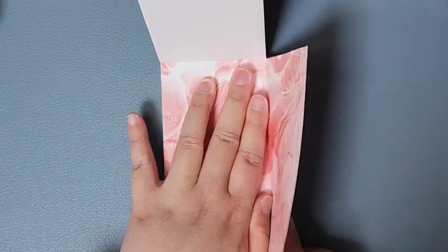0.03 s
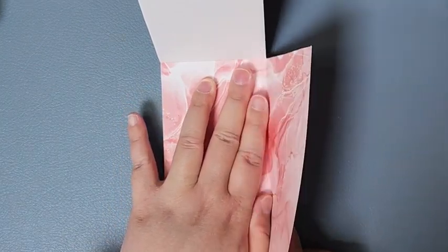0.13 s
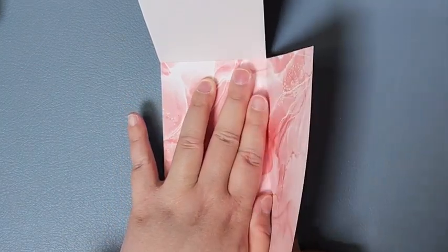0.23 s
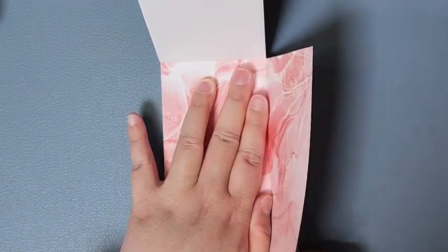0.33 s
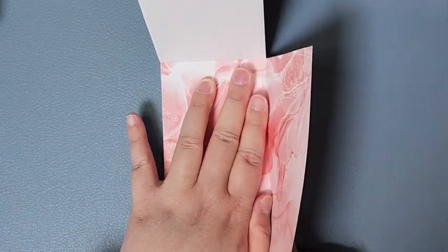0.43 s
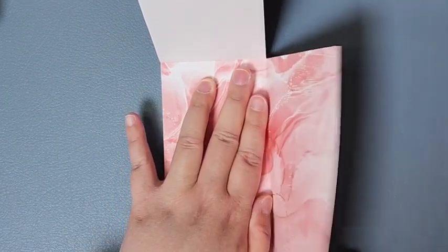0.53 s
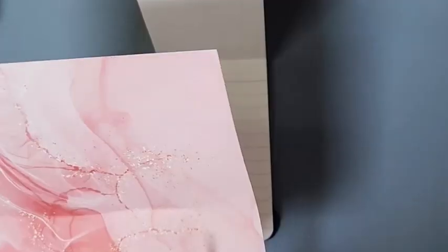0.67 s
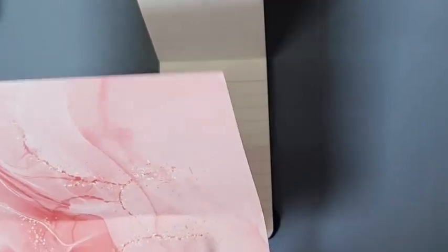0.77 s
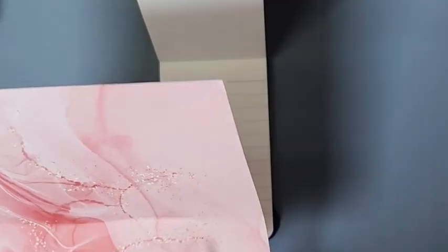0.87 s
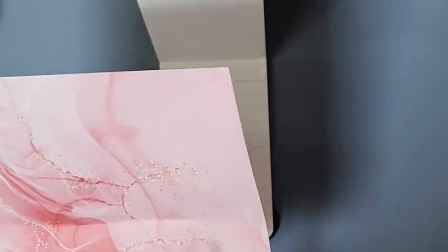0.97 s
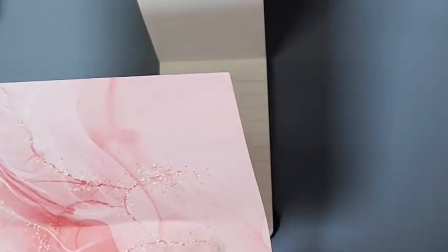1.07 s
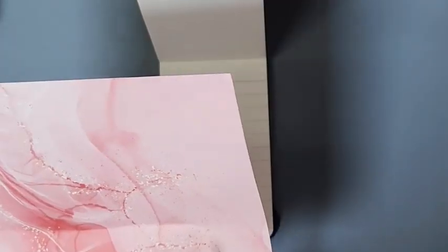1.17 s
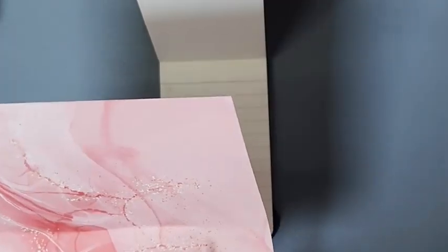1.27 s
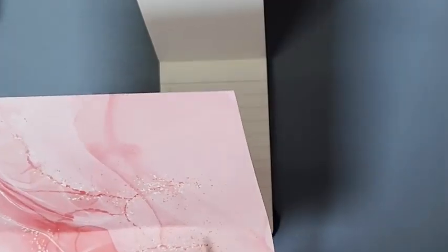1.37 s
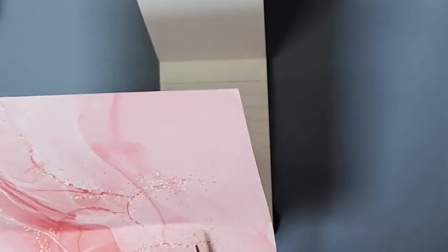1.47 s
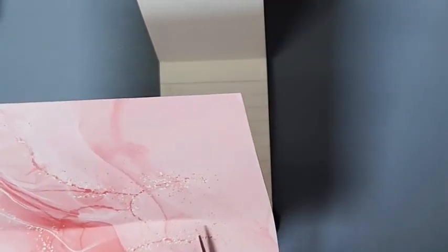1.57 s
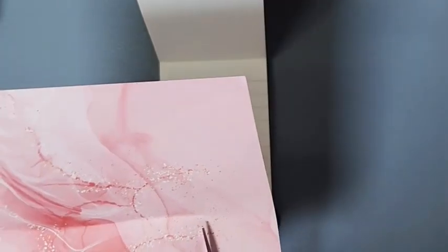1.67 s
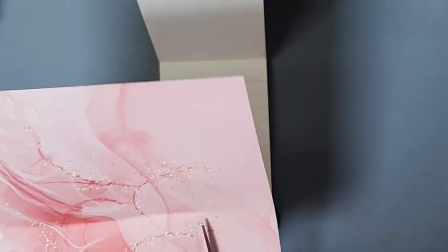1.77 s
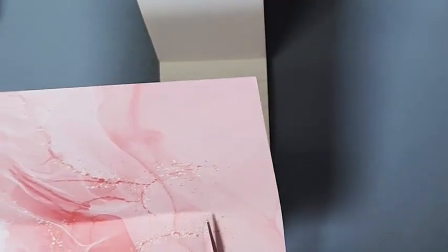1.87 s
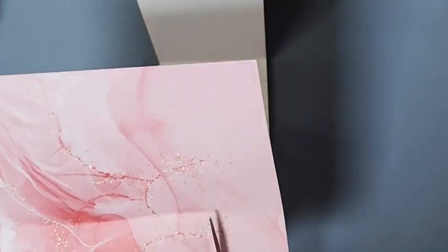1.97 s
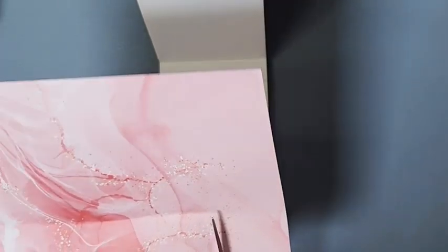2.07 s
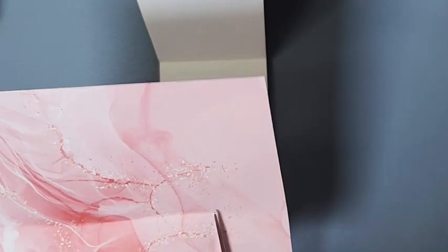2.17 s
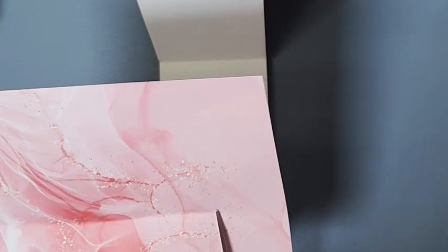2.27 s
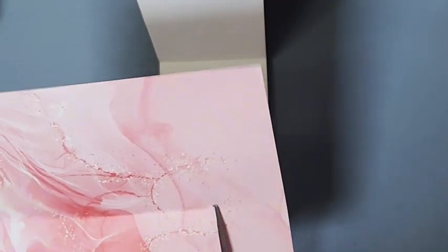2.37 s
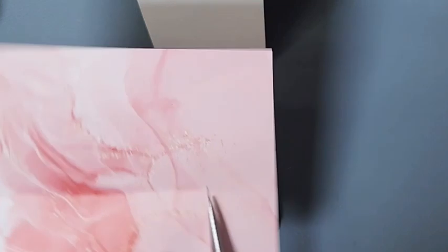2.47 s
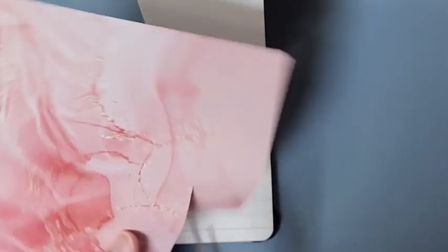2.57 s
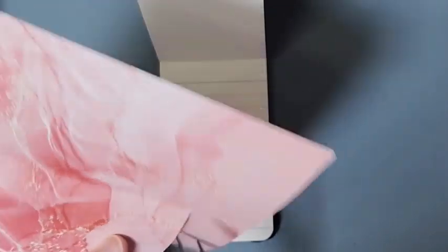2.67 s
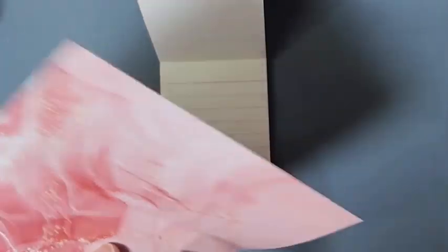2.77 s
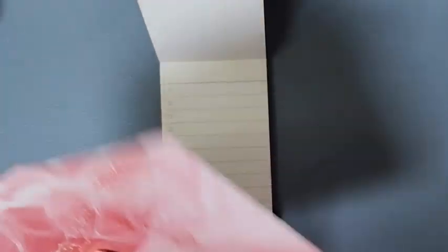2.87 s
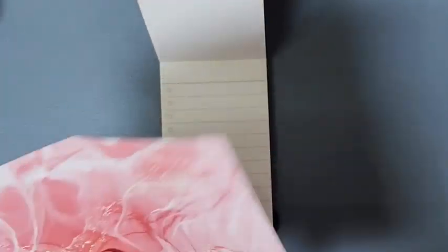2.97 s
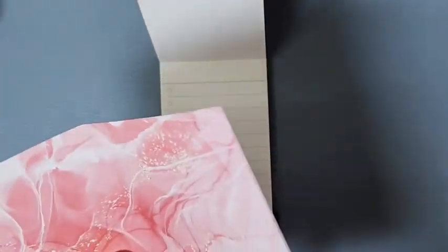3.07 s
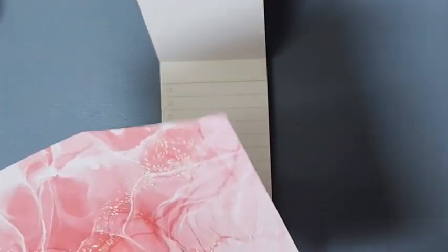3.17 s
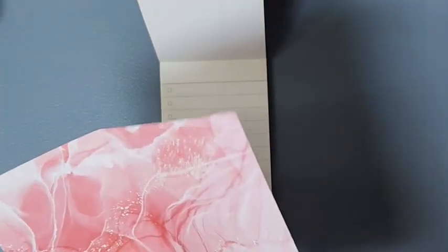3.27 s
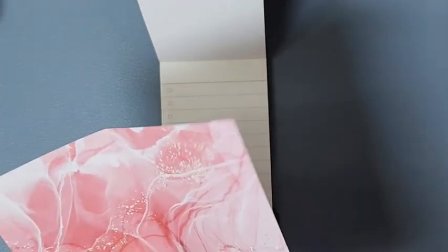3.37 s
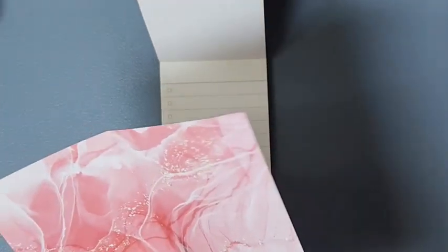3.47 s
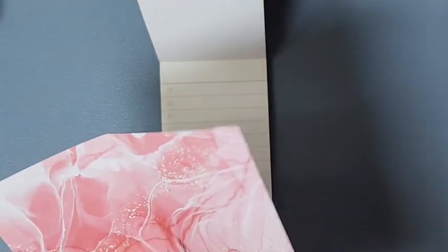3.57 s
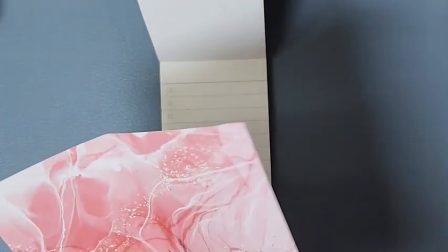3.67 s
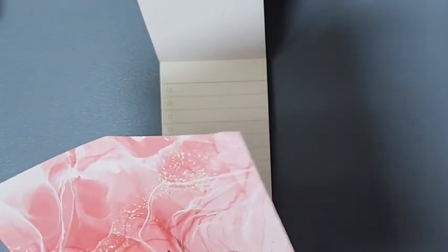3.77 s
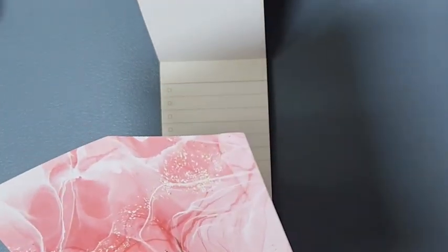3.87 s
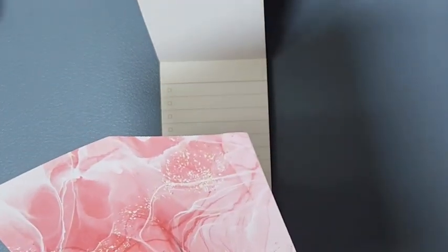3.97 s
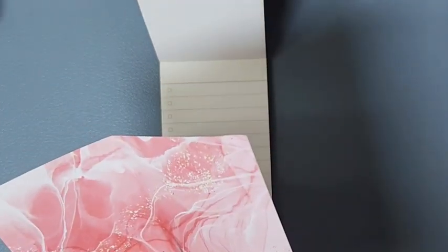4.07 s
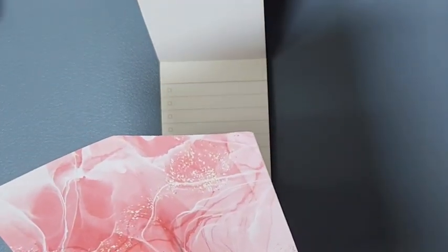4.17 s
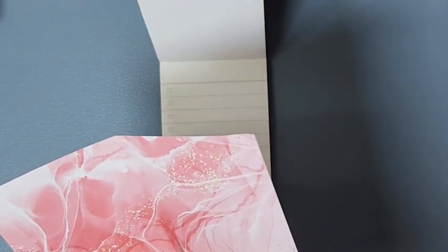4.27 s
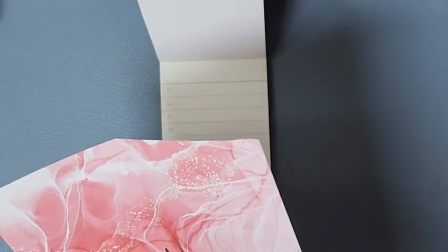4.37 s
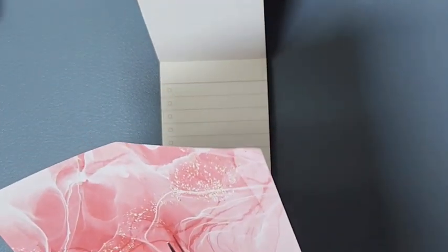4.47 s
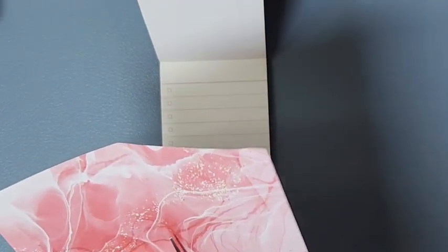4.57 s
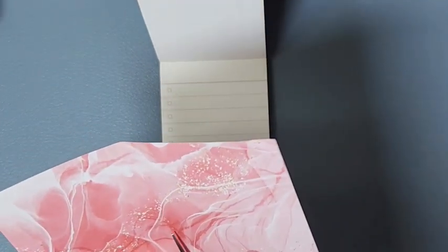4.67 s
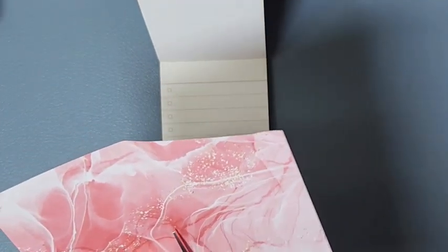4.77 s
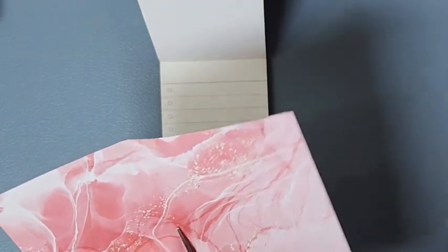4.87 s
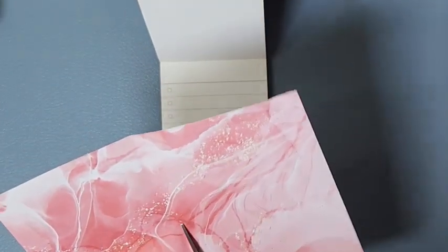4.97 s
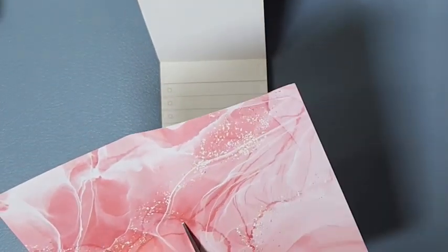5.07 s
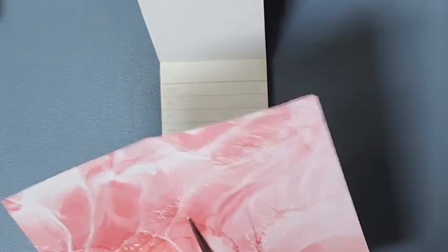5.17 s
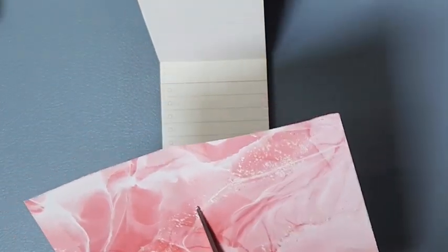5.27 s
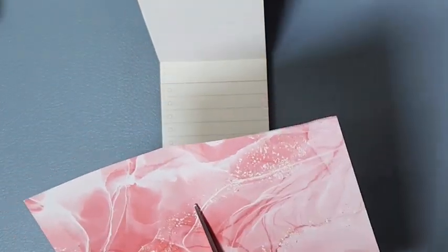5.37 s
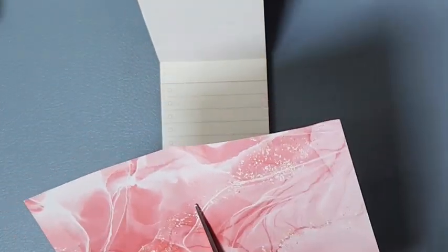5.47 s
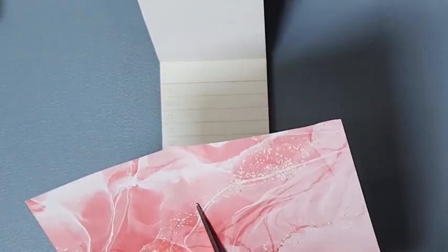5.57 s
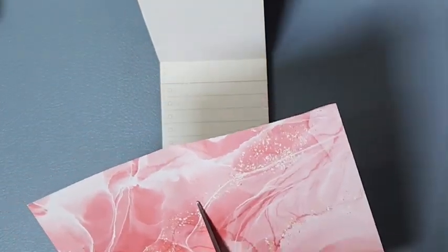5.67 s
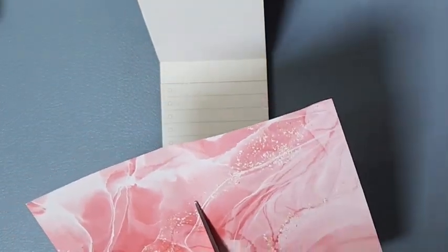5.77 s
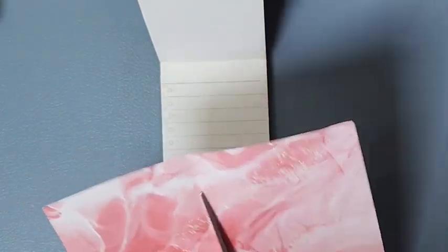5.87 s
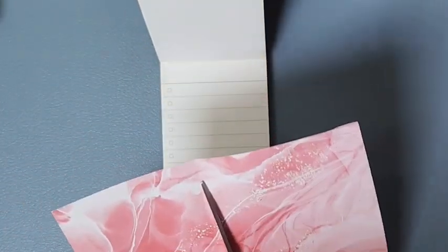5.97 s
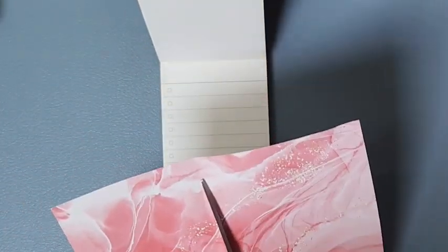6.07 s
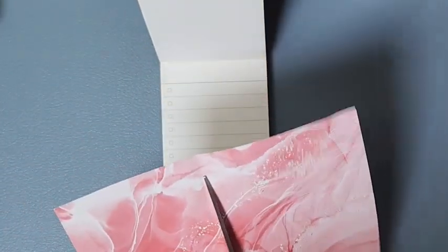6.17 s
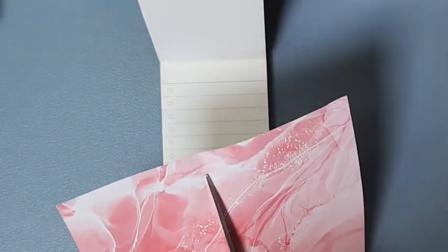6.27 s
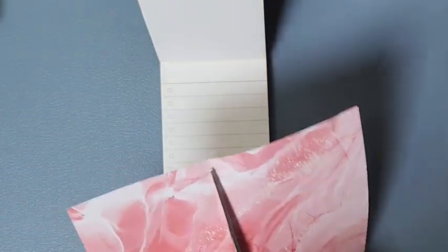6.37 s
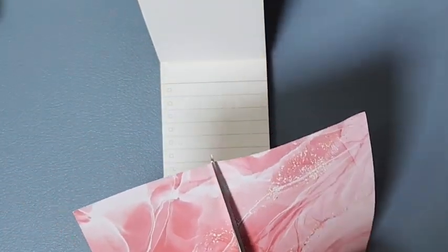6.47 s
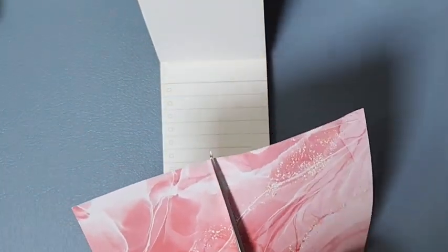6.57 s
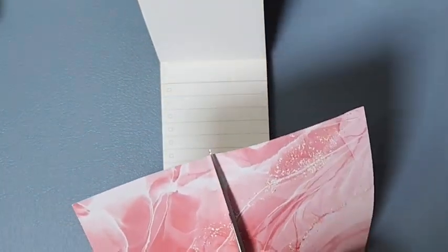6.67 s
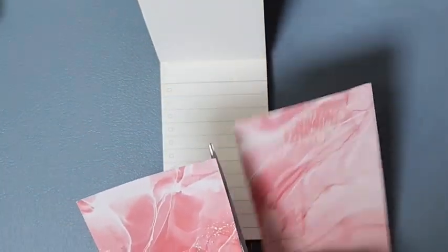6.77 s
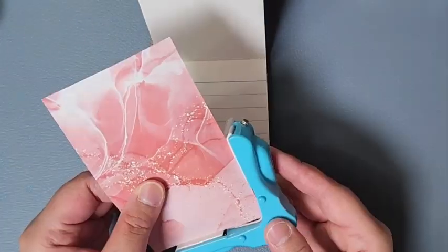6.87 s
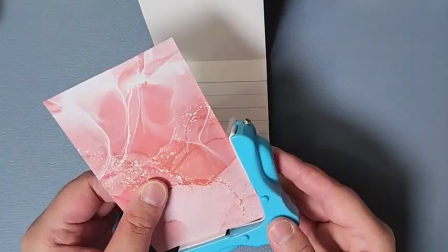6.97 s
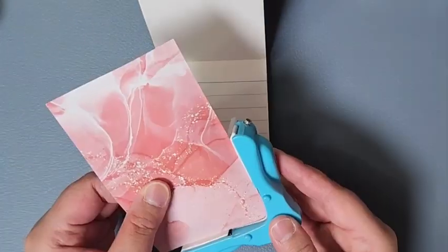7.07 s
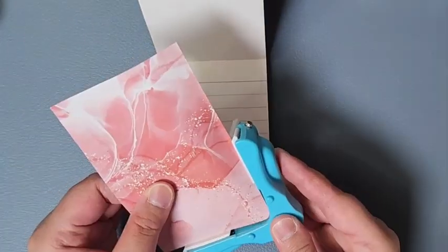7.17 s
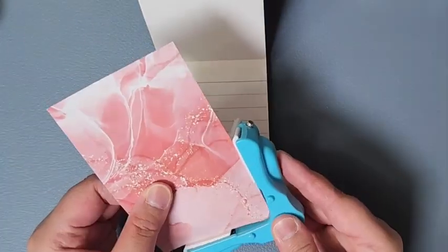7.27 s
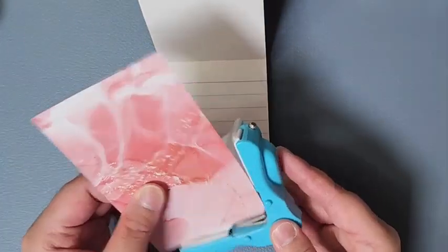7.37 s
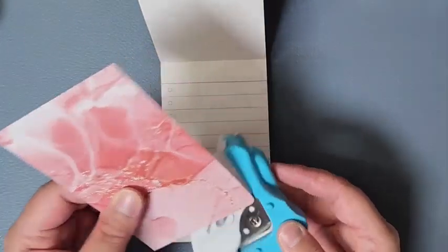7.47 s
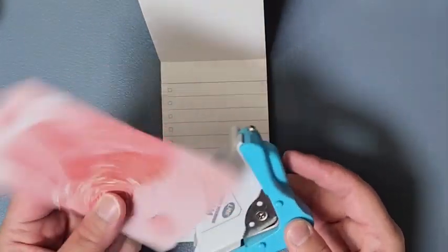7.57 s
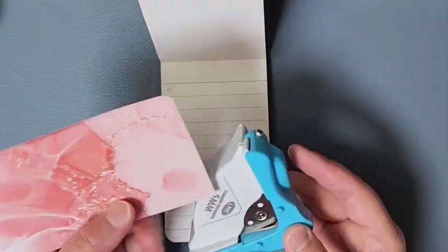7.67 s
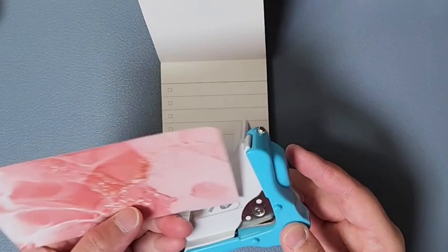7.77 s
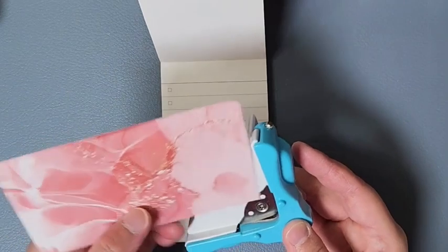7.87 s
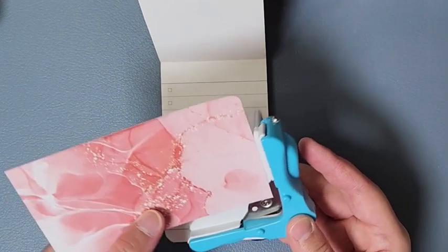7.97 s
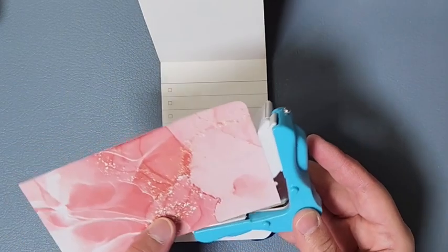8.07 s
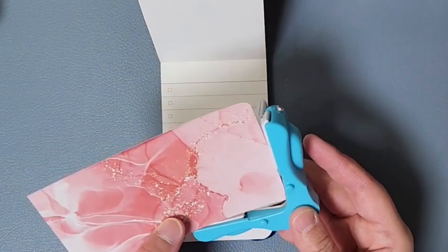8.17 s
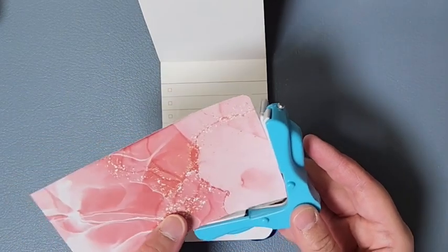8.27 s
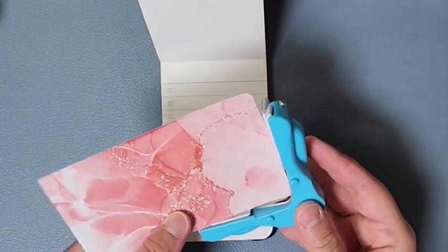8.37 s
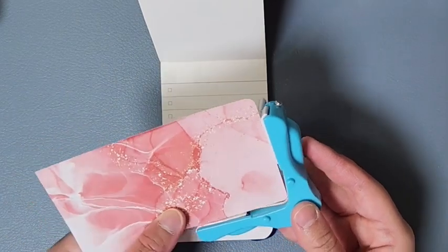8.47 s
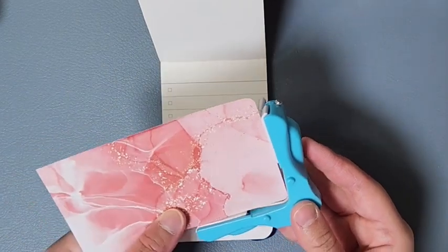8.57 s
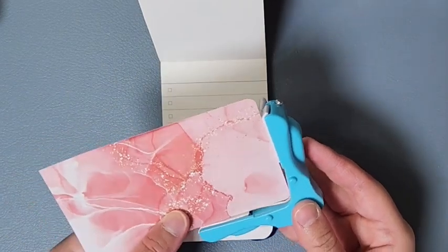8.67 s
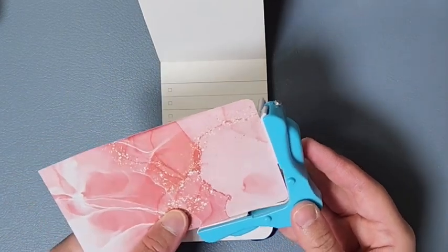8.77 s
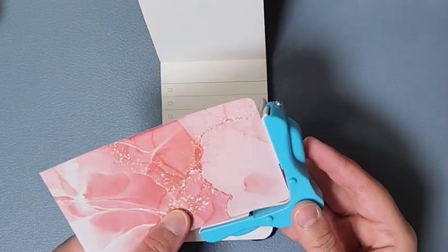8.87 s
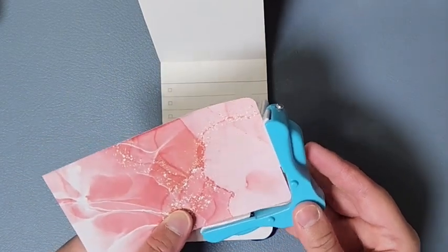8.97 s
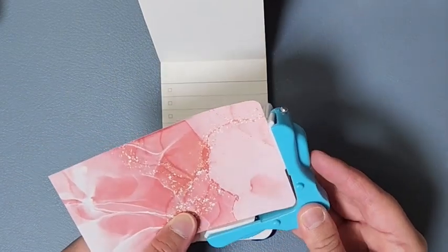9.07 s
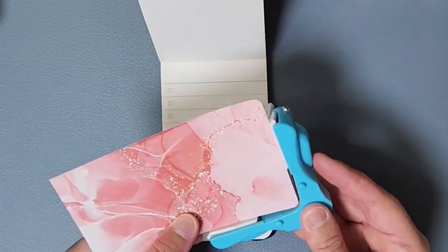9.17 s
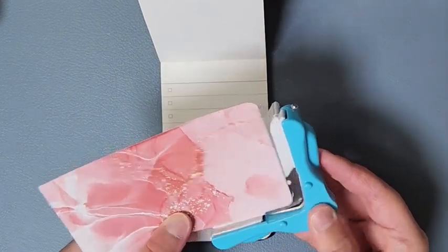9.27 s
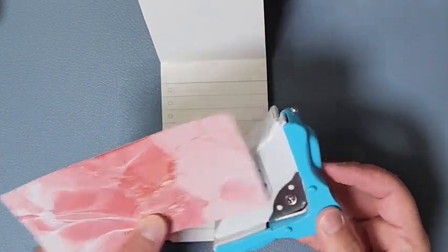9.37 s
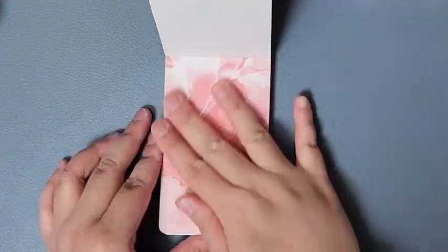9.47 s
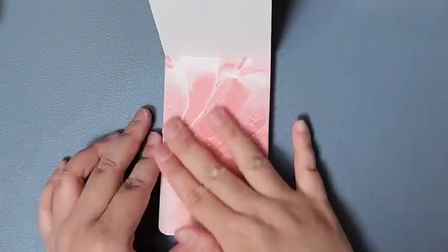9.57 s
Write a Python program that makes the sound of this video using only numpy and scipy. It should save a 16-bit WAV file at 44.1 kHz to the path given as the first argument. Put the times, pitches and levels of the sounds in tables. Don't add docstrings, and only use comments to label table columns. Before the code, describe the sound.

Scissors crunch jerkily through a paper sheet amid rustling and taps, followed by two sharp corner-punch clacks with dull desk thuds in a damped room.

```python
import sys
import numpy as np
from scipy import signal
from scipy.fft import rfft, irfft
from scipy.io import wavfile
from scipy.ndimage import uniform_filter1d

SR = 44100
rng = np.random.default_rng(int(sys.argv[2]) if len(sys.argv) > 2 else 0)


def pcm_store(signal):
    levels = np.round(np.clip(np.atleast_2d(signal), -1, 1) * 32767)
    wavfile.write(sys.argv[1], SR, levels.astype(np.int16).T)


def level_to_linear(level):
    exponent = np.asarray(level, float) / 20
    return 10 ** exponent


N = 423801

# frequency [Hz], density [dB per Hz].
AIR_SPECTRUM = [(36, -28.5), (45, -13), (70, -3.5), (90, -21.5), (130, -8.5), (170, -26.5), (240, -21),
                (400, -34), (560, -33), (2200, -41.5), (3600, -36.5), (6800, -39), (7200, -43),
                (15500, -49)]
# frequency [Hz], level [dB].
HUM_LINES = [(48.4, -57.5), (59.5, -63.5), (128, -72.5)]

# start [s], length [s], first level [dB], last level [dB], brightness [dB].
SMOOTHING = [
    (0.109, 0.29, -48.5, -74, -12.5),
    (0.222, 0.083, -51.5, -53, -12.5),
    (0.592, 0.035, -58, -49, -6),
    (0.628, 0.038, -44.5, -42, -1),
    (9.518, 0.11, -50, -47, 5),
]
# start [s], length [s], first and last level [dB], brightness [dB].
RUSTLES = [(0.506, 0.085, -58, -65, -18), (0.703, 0.12, -71, -56, -1), (0.831, 0.17, -60, -75, -3.5),
           (0.978, 0.063, -77, -50.5, -4), (1.04, 0.11, -44.5, -78, -1), (2.398, 0.079, -58.5, -57.5, -1.5),
           (2.46, 0.13, -48, -32, -3), (2.571, 0.11, -43, -42, 5), (2.687, 0.13, -58, -43.5, 0),
           (2.765, 0.095, -43, -40.5, -3.5), (2.857, 0.069, -45, -41, 1), (2.931, 0.15, -44, -48, 0.5),
           (3.086, 0.078, -50, -60.5, 1.5), (3.165, 0.17, -56, -53, -4), (3.349, 0.12, -53.5, -65, 0),
           (3.451, 0.094, -57, -77, -16), (5.349, 0.09, -58.5, -66.5, -6.5), (6.248, 0.075, -62, -53, -7),
           (6.495, 0.047, -54, -55.5, -10), (6.55, 0.15, -53.5, -64, -7.5),
           (6.836, 0.025, -51.5, -43.5, -4), (6.865, 0.01, -32, -42.5, -4), (6.876, 0.024, -35, -34, -0.5),
           (6.909, .015, -45, -47, 2), (7.146, 0.032, -43, -50, -7), (7.31, 0.098, -57, -60.5, 2),
           (7.392, .035, -57, -62, 4), (7.545, 0.18, -66.5, -54, 5.5), (7.722, 0.18, -58.5, -59.5, 0.2),
           (7.947, 0.19, -70.5, -57.5, -1), (8.205, 0.09, -58, -57, -5), (8.384, 0.19, -61, -57, -8),
           (8.546, 0.056, -47, -66.5, -26), (9.29, 0.039, -68, -46.5, -2), (9.401, 0.1, -57, -53.5, -0.5)]
# time [s], peak [dB], hiss [dB], length [s].
SNAPS = [(.319, -55, -30, 0.015), (.503, -44, -39, 0.009), (2.578, -23, -14, 0.012),
         (2.772, -35, -3, 0.0063), (2.801, -40, -1, 0.012), (2.848, -35, -9, 0.0073),
         (2.943, -39, 9, 0.0047), (2.507, -27, 0.5, 0.0059), (2.607, -33.5, -3, .005),
         (2.624, -29.5, 1, 0.0037), (2.93, -37.5, 0.5, 0.011), (3.297, -37, -10, 0.0089),
         (3.312, -36.5, -10, 0.017), (3.345, -41, -7, 0.0035), (5.035, -26, -4, 0.0025),
         (5.052, -37, -6, 0.0024), (5.064, -38, -9, 0.003), (5.088, -43.5, -5, 0.004),
         (5.104, -45, -7, 0.0053), (5.4, -54, -19, 0.016), (5.537, -43.5, -27, 0.02),
         (6.283, -31, -17, 0.0039), (6.318, -42, -14, 0.0061), (6.613, -34, -41, 0.014),
         (6.863, -20, -13, .003), (6.929, -27, -7, 0.0013), (7.108, -32.5, -25, 0.01),
         (7.139, -31, -22, 0.0044), (7.71, -31.5, -35, 0.013), (7.812, -41.5, -13, 0.01),
         (7.954, -48, -8, 0.0044), (7.991, -50.5, -21.5, 0.0086), (8.223, -47, -13, 0.0046),
         (8.265, -44, -11, .004), (8.28, -49.5, -8, .005), (8.955, -46, -12, 0.0055),
         (8.007, -38, -15.5, 0.0088), (8.46, -46.5, -8, 0.014), (8.542, -26, -16, 0.017),
         (8.652, -32.5, -13, 0.012), (8.739, -40, -21, 0.009), (9.274, -33.5, -17, 0.012)]
# time [s], peak [dB].
KNOCKS = [(0.337, -25), (0.344, -19), (0.348, -9.5), (0.581, -14.5), (.589, -12.5), (0.599, -18),
          (.613, -26), (0.632, -16.5)]
# frequency [Hz], level [dB], decay time T60 [s].
PAD_MODES = [(209, -16, 0.089), (455, -18.5, 0.1), (686, -1.5, 0.043), (822, -3, 0.053), (1250, -16, .025)]
# time [s], peak [dB], frequency [Hz], T60 [s].
HOLLOW_TAPS = [(0.125, -33, 93, 0.062), (1.179, -46, 375, 0.44), (3.239, -38, 502, 0.17),
               (3.32, -35, 523, 0.04), (3.911, -59, 576, 0.096), (6.311, -38, 1417, 0.065),
               (8.152, -37, 1660, 0.045), (7.669, -38.5, 490, 0.058), (7.723, -35.5, 470, 0.03),
               (8.055, -34, 520, 0.03), (8.313, -33, 1218, 0.045), (8.681, -20.5, 401.4, 0.075)]
# time [s], peak [dB], flap [dB], hiss [dB], length [s].
DROPS = [(2.507, -23.5, -46.5, -15, 0.023), (2.555, -17.5, -3, 3, 0.0015), (2.918, -12, -6, -30, 0.022),
         (6.807, -17, -4, -14, 0.0059), (6.939, -14, -12, -10.5, 0.0083), (7.04, -13, -11.5, -35.5, 0.018),
         (7.396, -34, -0.5, -16, 0.012), (7.4, -16.5, -10, -14.5, 0.0061), (7.408, -42, -2, -16, 0.023),
         (8.511, -37.5, -4.5, -6.5, 0.013), (8.679, -26, 1, -13.5, 0.017)]
# frequency [Hz], width [Hz], gain [dB].
SHEET_PEAKS = [(493, 58, 3.5), (1338, 32, 9.5), (3800, 840, 1), (5500, 3800, 7)]
DESK_TOP_PEAKS = [(379, 91, 1.5), (620, 240, -3), (1330, 1500, 19.5)]
# from [s], to [s], first and last pitch [Hz], level over the rustle [dB].
HUMMING_PANELS = [(2.76, 2.87, 3440, 3570, -4), (2.77, 2.87, 1350, 1300, -24), (2.95, 3.1, 1300, 1250, -12),
                  (2.94, 3.03, 514, 527, -2), (3.19, 3.36, 1270, 1250, 4), (3.2, 3.42, 549, 542, -6),
                  (3.2, 3.34, 3480, 3460, -3), (3.2, 3.36, 5500, 5600, -3)]

# time [s], blades meeting at 0 (pivot) to 1 (tips), crispness of the taut edge [dB].
CUT_REACH = [(1.15, 0.046, 3), (1.619, 0.14, -1.5), (1.69, 0.63, -4), (2.15, 0.56, -1.5), (2.34, 0.5, 2.5),
             (4.3, 0.051, 3.5), (4.86, 0.4, -1), (4.93, 1, -6), (5.6, 0.93, -10.5), (6.2, 0.75, -12),
             (6.762, 0.47, -4.5), (6.82, 0.67, -20)]
# start [s], length [s], first and last level [dB], sheet stiffness [dB].
CUTS = [(1.14, 0.11, -73, -53, -3), (1.252, 0.5, -57, -51.5, -6), (2.165, 0.21, -77, -49.5, -44),
        (4.3, 0.6, -57, -54.5, -11.5), (4.873, 0.22, -37, -59.5, -5), (5.575, 0.112, -54, -43.5, -23),
        (6.153, 0.037, -27, -39.5, -13.5), (6.639, 0.18, -62, -28, -11)]
# centre [s], level [dB], length [s].
SLOW_JERKS = [(1.1768, -41, 0.038), (1.213, -48.5, 0.022), (1.24, -45.5, 0.0095), (1.257, -51, .007),
              (1.293, -48, 0.016), (1.3318, -46, 0.0065), (1.358, -48.5, .011), (1.382, -49, 0.01),
              (1.429, -45, 0.037), (1.459, -42, 0.014), (1.4866, -38.5, 0.014), (1.521, -43, 0.011),
              (1.536, -39, 0.012), (1.5606, -36.5, 0.0095), (1.587, -36.5, 0.016), (1.599, -37, .005),
              (1.615, -36, 0.018), (1.632, -37, 0.0086), (1.645, -34, 0.013), (1.673, -26.5, 0.012),
              (1.7, -28, 0.012), (1.729, -31, 0.0044), (4.36, -53.5, 0.012), (4.419, -52, .008),
              (4.464, -50.5, 0.031), (4.512, -53, 0.027), (4.587, -42, 0.012), (4.623, -51.5, 0.0067),
              (4.646, -42, 0.0066), (4.6678, -39.5, 0.008), (4.686, -47, .006), (4.71, -41, 0.018),
              (4.741, -44.5, 0.009), (4.761, -42, 0.017), (4.7877, -37.5, 0.0094), (4.823, -39, 0.0055),
              (4.847, -37, 0.014), (4.866, -35, 0.011), (4.905, -34, 0.023), (4.93, -29, 0.013),
              (4.9698, -15, 0.008), (5.011, -11.5, 0.0062)]
# centre [s], level [dB], length [s], brightness [dB].
QUICK_JERKS = [(2.127, -51, 0.0093, 1), (2.1584, -28, 0.017, -1), (2.174, -33, 0.0059, -3),
               (2.197, -24, 0.0064, -3), (2.215, -42.5, .004, 2.5), (2.242, -25.5, 0.011, -2.5),
               (2.2657, -33.5, 0.006, 3.5), (2.28, -46.5, 0.0021, 3.5), (2.301, -23.5, 0.0056, 3.5),
               (2.323, -28.5, 0.0094, 1), (2.343, -17, 0.0042, 2.5), (5.587, -31, 0.0049, -1.5),
               (5.603, -24.5, 0.0082, 3), (5.619, -22.5, 0.0065, -1), (5.633, -23.5, 0.0086, 3.5),
               (5.651, -26.5, 0.0078, 2), (5.676, -16, 0.0053, 1.5), (5.687, -24, 0.011, -2),
               (6.15, -24.5, 0.012, 3.5), (6.168, -23.5, 0.012, 0.5), (6.179, -25.5, 0.0062, -6),
               (6.187, -25.5, .005, 0.5), (6.21, -12.5, 0.0058, 4), (6.664, -39.5, 0.0039, -9.5),
               (6.686, -24, 0.018, -6.5), (6.713, -15.5, 0.0059, -1.5), (6.7286, -18.5, 0.0081, 0),
               (6.742, -14.5, 0.008, 3), (6.762, -15, 0.0027, -2), (6.7674, -14, 0.0028, 8),
               (6.775, -19.5, 0.0079, 0), (6.79, -25, 0.0049, 11), (6.808, -16, 0.0039, -9),
               (6.826, -26, 0.005, -12)]
# time [s], peak [dB], flap [dB], hiss [dB], length [s].
SHUTS = [(2.345, -17.5, -10.5, -13.5, 0.015), (4.884, -37, -23.5, 1, 0.009),
         (5.027, -28.5, -8, -13.5, 0.018), (5.694, -29, -20.5, -4, 0.0065), (6.211, -13.5, -19, -25, 0.015),
         (6.815, -44, -3, -53, 0.016)]
# start [s], length [s], level [dB].
OPENINGS = [(1.852, 0.12, -40.5), (5.161, .16, -34.5), (5.832, 0.16, -36), (6.338, 0.15, -32.5)]
# frequency [Hz], width [Hz], gain [dB].
PIVOT_PEAKS = [(1360, 340, 10), (3426, 300, 9), (4370, 480, 2), (5150, 640, 23), (5780, 280, 4),
               (7210, 680, 8), (503, 79, 4), (13100, 140, 1.5)]
HALFWAY_PEAKS = [(1810, 2000, 11), (3820, 660, 6), (6230, 2500, 2.5), (9700, 1100, 4.5)]
TIP_PEAKS = [(1090, 470, 16), (1300, 130, 13), (1650, 130, 5), (2370, 33, 8), (4050, 600, 15.5),
             (5700, 490, 7.5)]
OPEN_PEAKS = [(1330, 52, 8), (1635, 500, 7.5), (2214, 35, -3), (2460, 140, 5), (3400, 500, 6.5),
              (4080, 850, 3.5), (5630, 790, 2), (13400, 9700, -12)]
# from [s], to [s], first and last pitch [Hz], level over cut [dB].
SINGING_BLADES = [(1.18, 1.653, 5380, 5290, -3), (1.15, 1.28, 4350, 4300, -4),
                  (1.155, 1.5, 12460, 12700, -7.5), (1.53, 2, 11000, 6000, -14.5),
                  (2.14, 2.338, 3850, 4200, -1.5), (2.228, 2.333, 6000, 6200, -3.5),
                  (4.3, 4.457, 4400, 4800, -2), (4.441, 4.88, 4500, 6400, -5),
                  (4.707, 4.88, 5770, 5300, -4.5), (4.8, 4.93, 7550, 7600, -9),
                  (4.5, 4.861, 490, 500, -4.5), (4.399, 4.897, 1380, 1330, -8.5),
                  (4.885, 4.955, 1380, 1300, 1.5), (6.345, 6.5, 2000, 2550, 0.5),
                  (6.36, 6.5, 1700, 1900, -2), (6.14, 6.2, 3000, 5200, -9), (2.33, 2.38, 7300, 3400, -9),
                  (5.6, 5.67, 4150, 3200, -16)]

# time [s], peak [dB], hiss [dB], length [s].
CRACKS = [(7.158, -25.5, -13, .006), (7.168, -24, -14, 0.0035), (9.053, -26, -21.5, 0.0063),
          (7.194, -19, -20, 0.0048), (7.2, -4, 2, 0.0025), (7.21, -1, -30, 0.005), (7.231, 2, -19, 0.0047),
          (7.249, -6, 2, 0.0038), (7.448, -2, -5, 0.0066), (8.149, -26.5, -18.5, 0.0082),
          (8.305, -32.5, -21, 0.021), (8.977, -28, -9, 0.0035), (8.984, -11.5, -25, 0.0055),
          (9.03, -33, -2.5, 0.0072), (9.044, -38, -20, 0.013), (9.064, -4, -8, 0.0026),
          (9.079, -9, -25, 0.0045), (9.088, -17, -20, 0.0036), (9.111, -11.5, 2, 0.0039),
          (9.331, -3, -7.5, 0.0067)]
# time [s], peak [dB], flap [dB], hiss [dB], length [s].
CRUNCHES = [(7.254, -21, -18, -1, .008), (7.261, -16.5, -18, -1.5, 0.029),
            (7.456, -25.5, -14.5, -0.5, 0.044), (9.052, -34.5, 1, -30, 0.045), (9.116, -17, -20, 0, .01),
            (9.121, -16.5, -25, -4, 0.012), (9.125, -21, -25, 0.5, 0.039), (9.325, -31, 1, -9, 0.012),
            (9.34, -19, -26, -4, 0.032)]
# frequency [Hz], width [Hz], gain [dB].
SHELL_PEAKS = [(1670, 180, 15), (2380, 2200, 6.5), (7140, 1100, 6), (7850, 660, -0.5)]
DIE_PEAKS = [(1250, 330, 3), (3230, 4700, 9.5), (7500, 1700, 8.5), (9900, 500, 6.5)]
# time [s], peak [dB].
THUDS = [(7.211, -28.5), (7.247, -32), (7.453, -22.5), (9.066, -21), (9.114, -19.5), (9.337, -15)]
# time [s], peak [dB].
HANDLE_KNOCK = (7.041, -19)
LEVER_RETURN = (9.333, -21)
# frequency [Hz], level [dB], T60 [s].
DESK_MODES = [(74.9, -2, .25), (60.6, -12, 0.26), (122, -13, 0.2)]
HANDLE_MODES = [(837, -4.5, 0.07), (1314, -0.5, 0.051), (1670, -3, 0.041), (2595, -13, .05)]
SPRING_MODES = [(5071, -49, .35)]
LEVER_MODES = [(2170, 0, 0.051)]

TOP_HZ = 15500


def air():
    hz = np.maximum(np.arange(N // 2 + 1) * SR / N, 1)
    points = np.array(AIR_SPECTRUM)
    density_db = np.interp(np.log(hz), np.log(points[:, 0]), points[:, 1])
    hiss = irfft(rfft(rng.standard_normal(N)) * level_to_linear(density_db), N)
    t = np.arange(N) / SR
    hum = sum(np.sqrt(2) * level_to_linear(db) * np.sin(2 * np.pi * line_hz * t) for line_hz, db in HUM_LINES)
    return level_to_linear(-58) * hiss / hiss.std() + hum


def band(x, low_hz, high_hz, order=3):
    return signal.sosfilt(signal.butter(order, [low_hz, high_hz], "band", fs=SR, output="sos"), x)


def low_pass(x, cutoff_hz):
    return signal.sosfilt(signal.butter(2, cutoff_hz, fs=SR, output="sos"), x)


def one_pole(x, corner_hz):
    return signal.lfilter([1], [1, -np.exp(-2 * np.pi * corner_hz / SR)], x)


def strokes(rows, attack_s, release_s):
    out = np.zeros((3, N))
    for s, length, first_db, last_db, first_bright_db, last_bright_db in rows:
        at = int(s * SR)
        age = np.arange(min(int((length + release_s) * SR), N - at)) / SR
        edge = np.clip(np.minimum(age / attack_s, (length + release_s - age) / release_s), 0, 1)
        level = first_db + (last_db - first_db) * age / length
        bright = first_bright_db + (last_bright_db - first_bright_db) * age / length
        flap = level - 0.4 * bright
        out[:, at:at + len(age)] += edge * level_to_linear([flap, level, level + bright])
    return out


def even_strokes(rows, attack_s, release_s):
    return strokes([(*row, row[-1]) for row in rows], attack_s, release_s)


def bursts(rows, rise, body_db):
    out = np.zeros((3, N))
    for s, peak_db, flap_db, hiss_db, length in rows:
        at = int(s * SR)
        age = np.arange(int(5 * length * SR)) / (length * SR)
        shape = np.minimum(age / rise, 1) * np.exp(-2.3 * np.maximum(age - rise, 0))
        gains = level_to_linear(peak_db + np.array([flap_db, body_db, hiss_db]))
        out[:, at:at + len(age)] += gains[:, None] * shape[:N - at]
    return out


def with_flap(rows, flap_db, share):
    return [(s, db, flap_db - (1 - share) * db, hiss_db, length) for s, db, hiss_db, length in rows]


def wandering(wander_db):
    frames, size = N // 256 + 2, 512
    field = rng.standard_normal((frames, size // 2 + 1))
    for _ in range(2):
        field = uniform_filter1d(uniform_filter1d(field, size=9, axis=0), size=3, axis=1)
    spectra = rfft(rng.standard_normal((2, frames, size))) * level_to_linear(wander_db * field / field.std())
    pieces = irfft(spectra) * np.sin(np.pi * np.arange(size) / size)
    joined = pieces[:, 1:, :size // 2] + pieces[:, :-1, size // 2:]
    noise = joined.reshape(2, -1)[:, :N]
    return noise[[0, 1, 0]] / noise.std()


def grainy(noise, grain_db, grain_hz):
    fibres_per_s, fibre_db, fibre_s = 120, -4, 0.0006
    flicker = one_pole(rng.standard_normal(N), grain_hz)
    tears = (rng.random(N) < fibres_per_s / SR) * rng.exponential(level_to_linear(fibre_db), N)
    ticks = signal.lfilter([1], [1, -np.exp(-1 / (fibre_s * SR))], tears)
    gain = level_to_linear(grain_db * flicker / flicker.std()) * (1 + ticks)
    return noise * gain / np.sqrt(np.mean(gain ** 2))


def resonate(x, body):
    for hz, width, db in body:
        w, r = 2 * np.pi * hz / SR, np.pi * width / SR
        x = signal.lfilter([1 + r * level_to_linear(db), -2 * np.cos(w), 1 - r * level_to_linear(db)], [1 + r, -2 * np.cos(w), 1 - r], x)
    return x


def sounded(gains, noise, body, top_hz):
    click = np.eye(1, 4096)[0]
    ranges = [(150, 754), (800, 3510), (3500, min(top_hz, .45 * SR))]
    busy = np.flatnonzero(np.sum(gains, axis=0))
    now = slice(busy[0], busy[-1] + SR // 10)
    drive = 0
    for g, n, limits in zip(gains, noise, ranges):
        energy = np.linalg.norm(resonate(band(click, *limits), body))
        drive = drive + band(g[now] * n[now] + 1e-18, *limits) / energy
    out = np.zeros(N)
    out[now] = resonate(drive, body)
    return out


def struck(rows, modes, soft_hz, spread_db):
    out, rows = np.zeros(N), np.array(rows)
    chance = rng.normal(0, 1, (len(rows), len(modes)))
    for (hz, db, t60), luck in zip(modes, chance.T):
        clicks = np.full(N, 1e-18)
        clicks[(rows[:, 0] * SR).astype(int)] = level_to_linear(rows[:, 1] + db + spread_db * luck)
        r, w = level_to_linear(-60 / (t60 * SR)), 2 * np.pi * hz / SR
        out += signal.lfilter([0, np.sin(w)], [1, -2 * r * np.cos(w), r * r], clicks)
    return low_pass(out, soft_hz)


def singing(modes, gain, noise):
    out = np.zeros(N)
    for start, end, first_hz, last_hz, db in modes:
        now = slice(int(start * SR), int(end * SR))
        age = np.arange(now.stop - now.start) / SR
        slow = low_pass(noise[:2, now], 0.06 * first_hz / 2)
        phase = 2 * np.pi * np.cumsum(np.linspace(first_hz, last_hz, len(age))) / SR
        fade = np.clip(np.minimum(age, age[-1] - age) / 0.025, 0, 1)
        tone = (slow[0] * np.cos(phase) + slow[1] * np.sin(phase)) / slow.std()
        out[now] += level_to_linear(db) * fade * gain[now] * tone
    return out


def rumble(gain, rumble_db):
    shake = band(rng.standard_normal(N), 45, 130)
    return level_to_linear(rumble_db) * uniform_filter1d(gain, 1500) * shake / shake.std()


def paper():
    slides = even_strokes(RUSTLES, 0.012, 0.01) * level_to_linear([[-3.0], [0], [-1.5]])
    rubs = even_strokes(SMOOTHING, 0.013, 0.0049) * level_to_linear([[-6.0], [0], [-1.5]])
    snaps = bursts(with_flap(SNAPS, flap_db=-27.5, share=0.64), rise=0.5, body_db=-9.5)
    fibres = grainy(wandering(3.2), 1.7, 49)
    rustle = sounded(slides + snaps, fibres, SHEET_PEAKS, TOP_HZ)
    rustle += sounded(rubs, fibres, [(2700, 8200, 6.6)], TOP_HZ)
    hum = singing(HUMMING_PANELS, slides[1], fibres[:, ::-1])
    drops = sounded(bursts(DROPS, rise=0.063, body_db=-6.5), rng.standard_normal((3, N)), DESK_TOP_PEAKS, 6500)
    knocks = struck(KNOCKS, PAD_MODES, 970, spread_db=1.5) * level_to_linear(-9)
    taps = np.zeros(N)
    for s, db, hz, t60 in HOLLOW_TAPS:
        taps += struck([(s, db), (s + 0.00899, db - 7.5)], [(hz, 0, t60)], 3000, 0)
    return rustle + hum + drops + knocks + taps + rumble(slides[0], -3.0)


def jerks(rows):
    out = np.zeros((2, N))
    for s, db, length, bright_db in rows:
        age = np.arange(-int(1.5 * length * SR), int(3.5 * length * SR))
        far = 2 * age / (length * SR)
        steepness = np.where(far < 0, 3.5, 1.6)
        shape = np.exp(-.6 * np.abs(far) ** steepness)
        out[:, int(s * SR) + age] += level_to_linear([[db], [db + bright_db]]) * shape
    return out


def scissors():
    s, reach, crisp_db = np.transpose(CUT_REACH)
    t = np.arange(N) / SR
    reach = np.clip(np.interp(t, s, reach), 0, 1)
    crisp = level_to_linear(np.interp(t, s, crisp_db))
    flap, drag, _ = even_strokes(CUTS, 0.023, 0.017)
    jerk, bright_jerk = jerks([(*row, 0) for row in SLOW_JERKS] + QUICK_JERKS)
    friction = np.hypot(drag, jerk)
    flap = flap * np.hypot(level_to_linear(-4.0), level_to_linear(-23.5) * jerk / (drag + 1e-9))
    hiss = crisp * np.hypot(level_to_linear(-2.0) * drag, bright_jerk)
    gains = bursts(SHUTS, rise=0.76, body_db=-7.5) + [flap, friction, hiss]

    tip_noise, pivot_noise = wandering(2.0), wandering(2.0)
    at_tips = np.sqrt(np.clip(2 * reach - 1, 0, 1))
    at_pivot = np.sqrt(np.clip(1 - 2 * reach, 0, 1))
    halfway = np.sqrt(1 - np.abs(2 * reach - 1))
    cut = sounded(gains * at_tips, grainy(tip_noise, 1.0, 200), TIP_PEAKS, TOP_HZ)
    cut += sounded(gains * at_pivot, grainy(pivot_noise, 0.95, 200), PIVOT_PEAKS, TOP_HZ)
    cut += sounded(gains * halfway, pivot_noise[:, ::-1], HALFWAY_PEAKS, TOP_HZ)

    opening = [(s, length, db, db + 1, 0, -3.5) for s, length, db in OPENINGS]
    _, body, hiss = strokes(opening, 0.043, 0.02)
    slide = sounded([level_to_linear(-7.5) * body, body, hiss], tip_noise, OPEN_PEAKS, TOP_HZ)
    sing = singing(SINGING_BLADES, friction + body, pivot_noise[:, ::-1])
    return cut + sing + slide + rumble(body, -11.5) + rumble(jerk, -19.5)


def handle():
    return struck([HANDLE_KNOCK], HANDLE_MODES, 6000, 0)


def punch():
    noise = rng.standard_normal((3, N))
    crack_gains = bursts(with_flap(CRACKS, flap_db=-26.5, share=0.39), rise=0.48, body_db=-5.5)
    cracks = sounded(crack_gains, noise, SHELL_PEAKS, 12500)
    crunch_gains = bursts(CRUNCHES, rise=0.049, body_db=-0.5)
    crunch = sounded(crunch_gains, grainy(noise[:, ::-1], 2.2, 150), DIE_PEAKS, TOP_HZ)
    return cracks + crunch + struck([(9.113, 0)], SPRING_MODES, 9000, 0)


def desk_thuds():
    return struck(THUDS, DESK_MODES, 290, 1.5)


def lever():
    return struck([LEVER_RETURN], LEVER_MODES, 6000, 0)


def room(x):
    t60_s, tail_db, wall_cut_hz = 0.11, -13, 4400
    age = np.arange(int(.3 * SR)) / SR
    tail = rng.standard_normal(len(age)) * level_to_linear(-60 * age / t60_s) * np.clip(age / 0.0009, 0, 1)
    tail = one_pole(tail, wall_cut_hz)
    return x + signal.fftconvolve(x, level_to_linear(tail_db) * tail / np.linalg.norm(tail))[:N]


def scene():
    in_room = room(paper() + scissors() + punch())
    return (air() + in_room + handle() + desk_thuds() + lever())[None]


def band_limit(x):
    return signal.sosfilt(signal.butter(12, 16790, fs=SR, output="sos"), x)


def record(dry):
    ceiling = 0.95
    firm = signal.sosfilt(signal.butter(3, 40, "high", fs=SR, output="sos"), dry)
    cut = signal.sosfilt(signal.cheby2(10, 32, 15850, fs=SR, output="sos"), firm)
    mix = ceiling * np.tanh(cut / ceiling)
    return band_limit(mix)


dry = scene()
out = record(dry)
pcm_store(out)
```